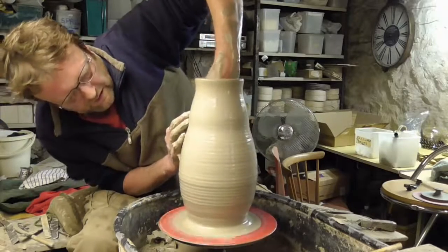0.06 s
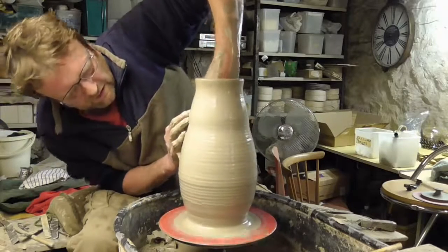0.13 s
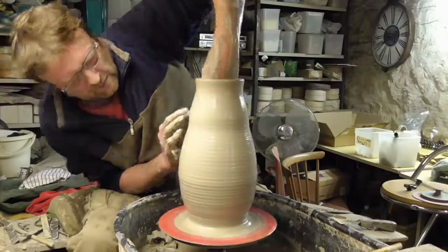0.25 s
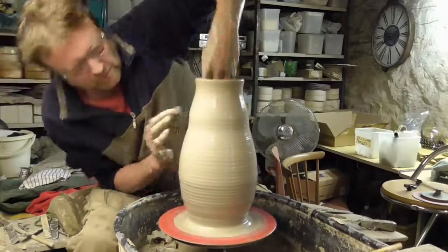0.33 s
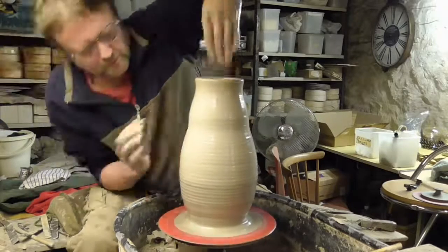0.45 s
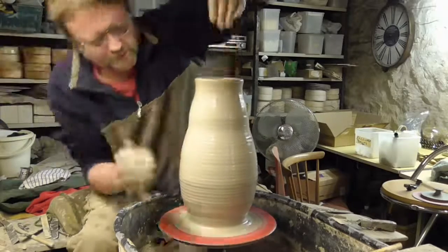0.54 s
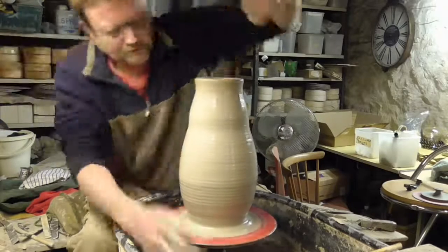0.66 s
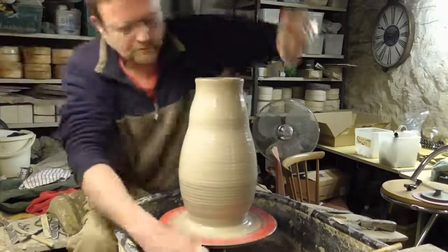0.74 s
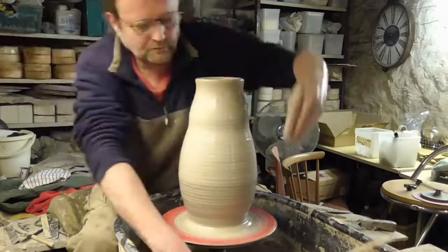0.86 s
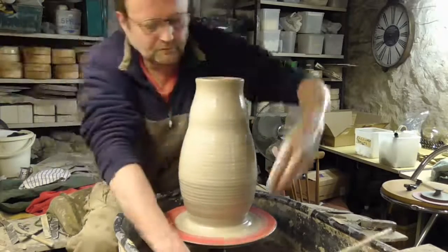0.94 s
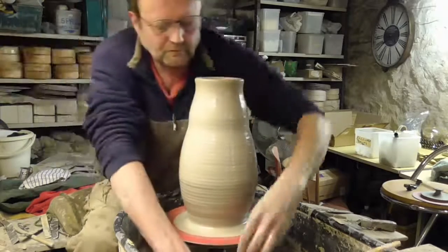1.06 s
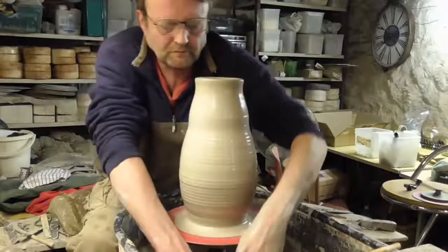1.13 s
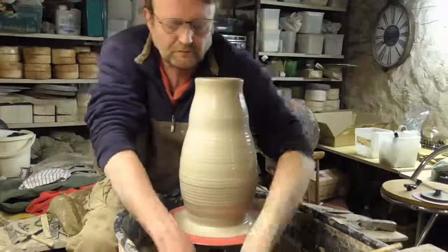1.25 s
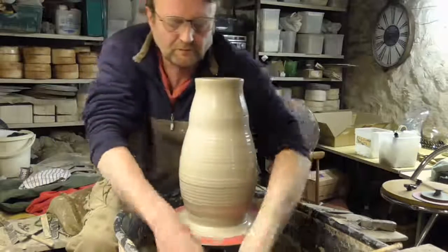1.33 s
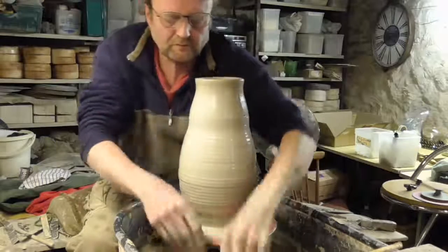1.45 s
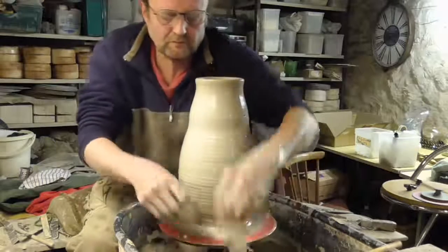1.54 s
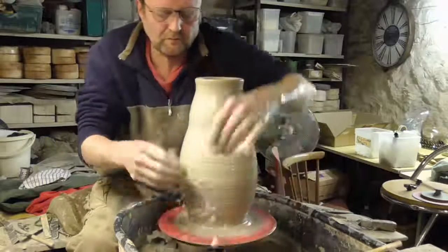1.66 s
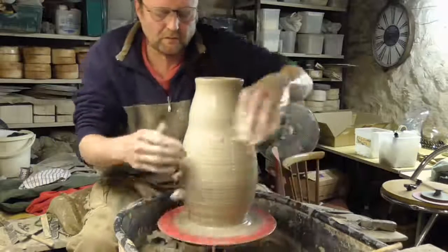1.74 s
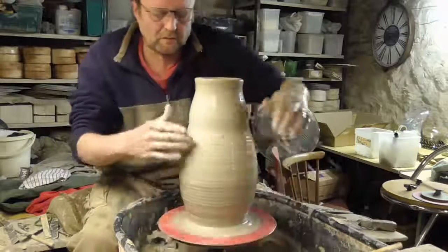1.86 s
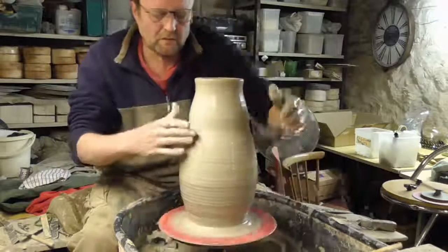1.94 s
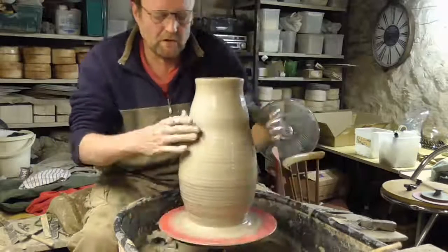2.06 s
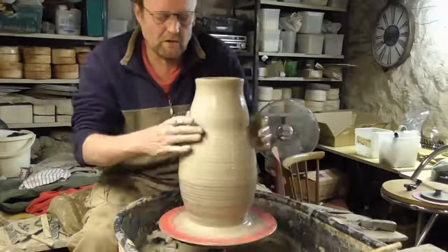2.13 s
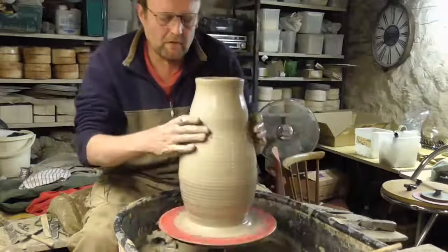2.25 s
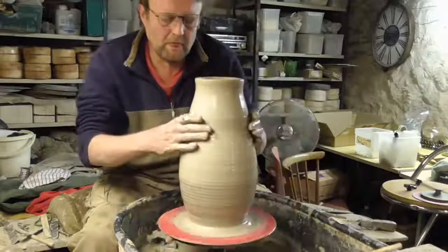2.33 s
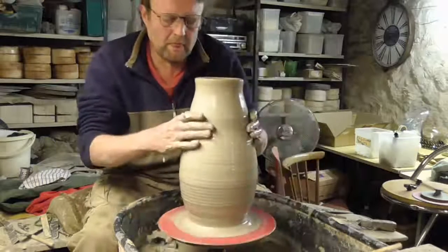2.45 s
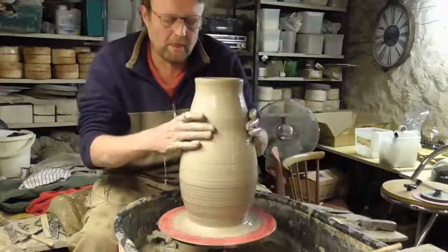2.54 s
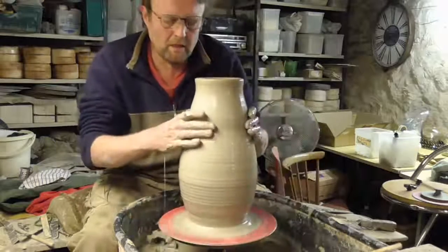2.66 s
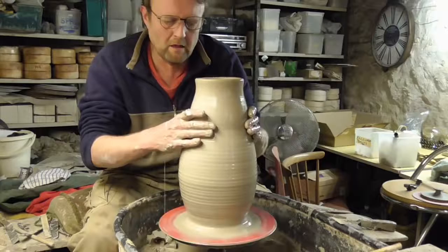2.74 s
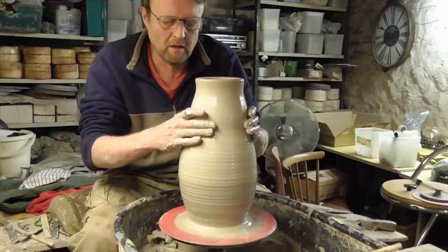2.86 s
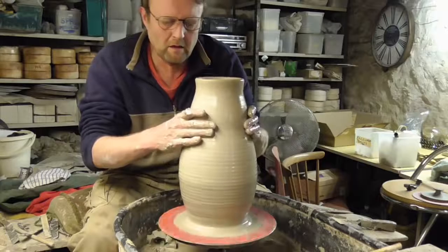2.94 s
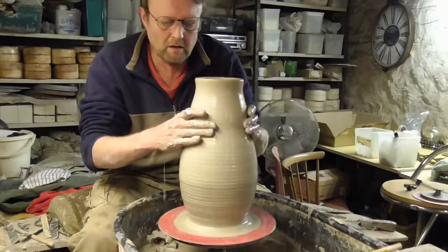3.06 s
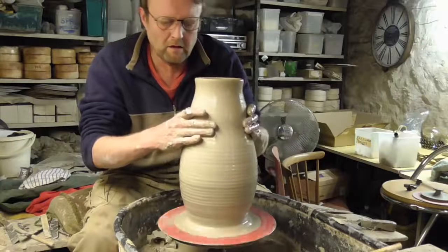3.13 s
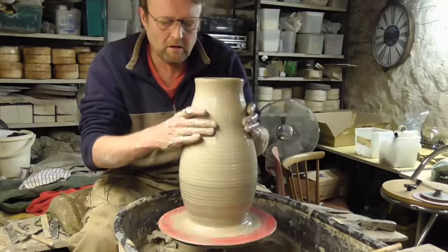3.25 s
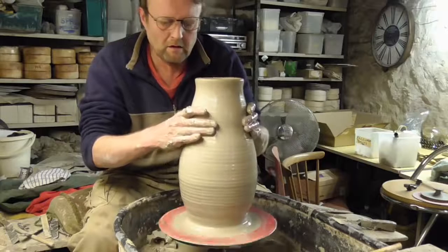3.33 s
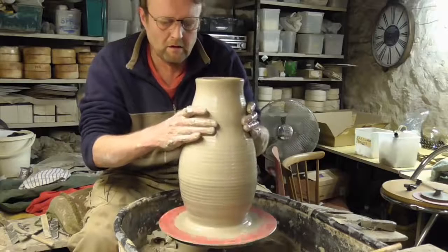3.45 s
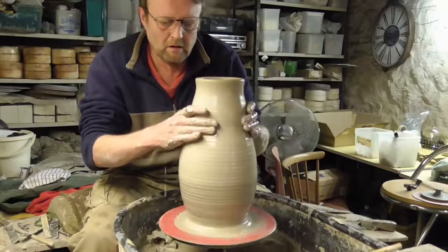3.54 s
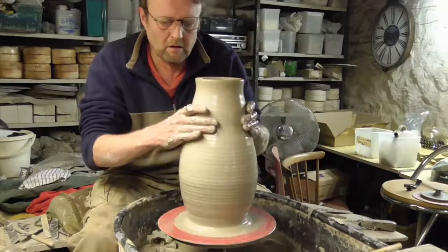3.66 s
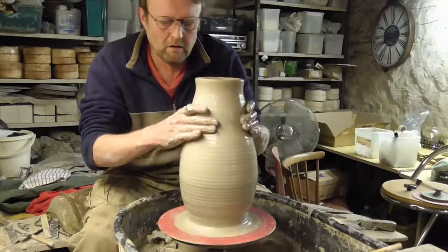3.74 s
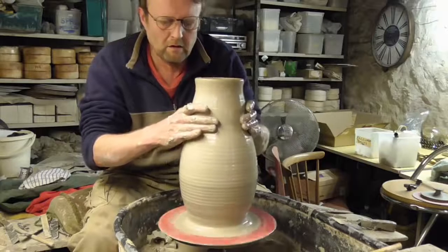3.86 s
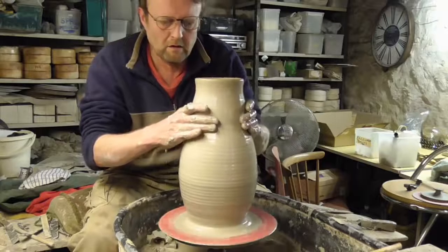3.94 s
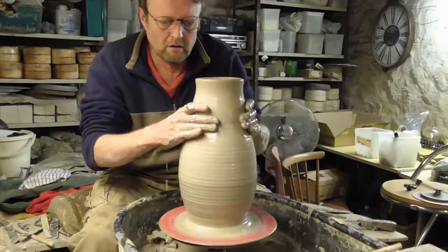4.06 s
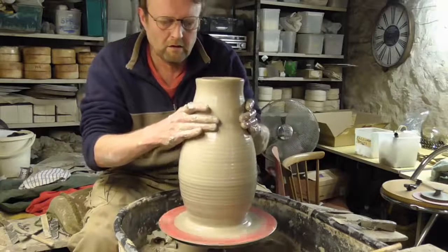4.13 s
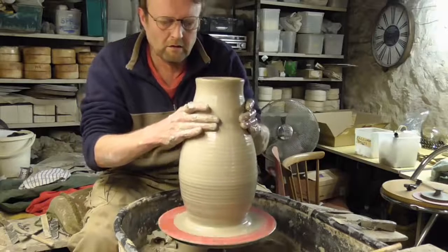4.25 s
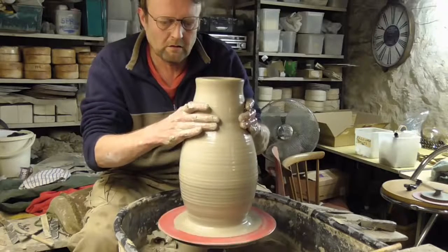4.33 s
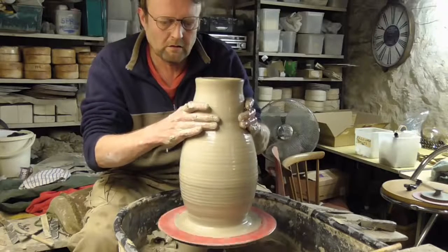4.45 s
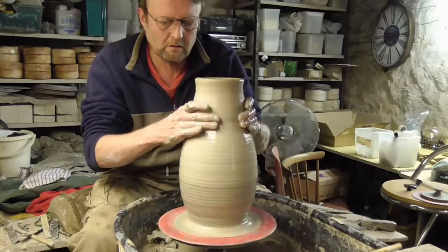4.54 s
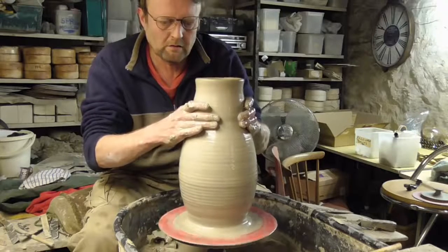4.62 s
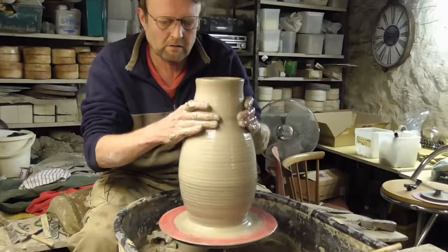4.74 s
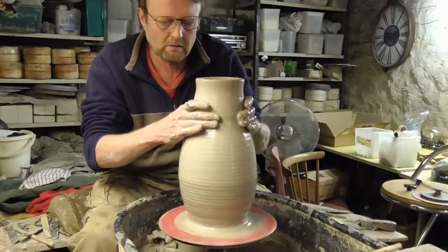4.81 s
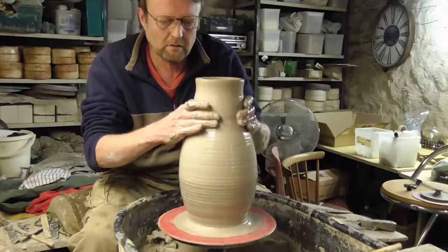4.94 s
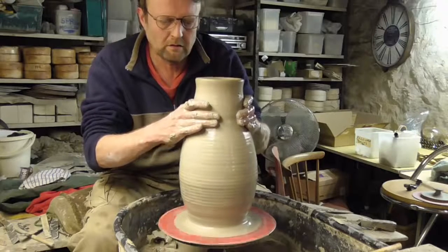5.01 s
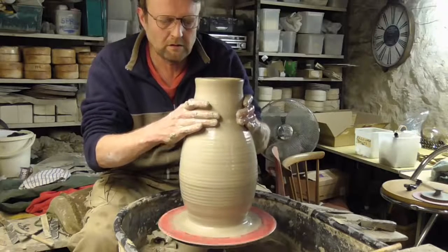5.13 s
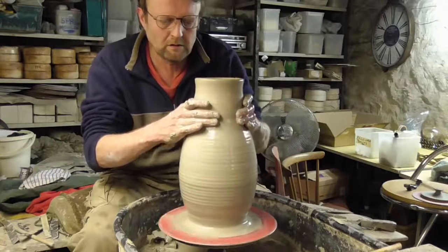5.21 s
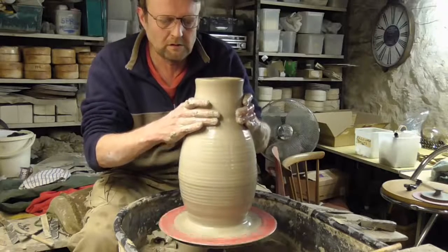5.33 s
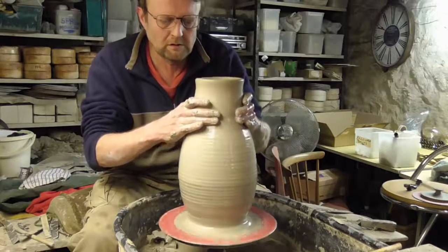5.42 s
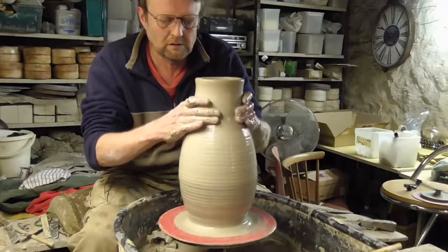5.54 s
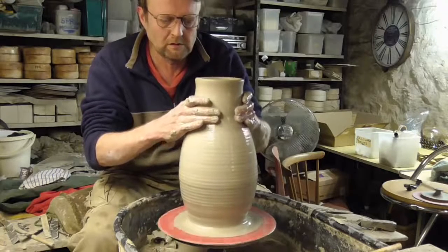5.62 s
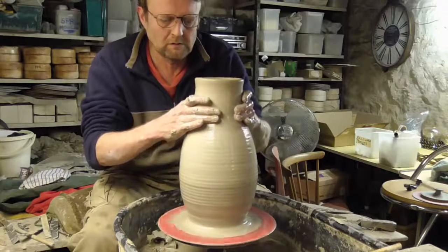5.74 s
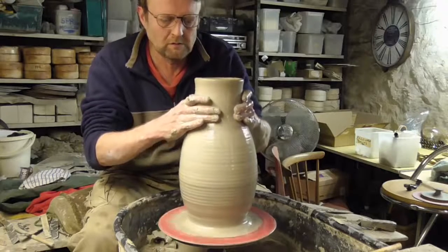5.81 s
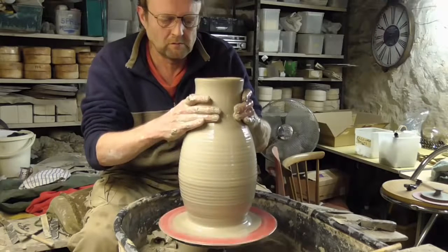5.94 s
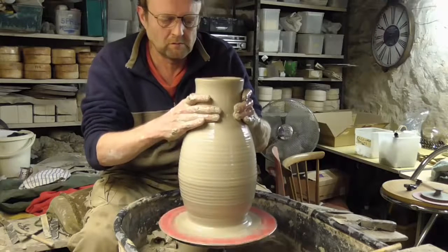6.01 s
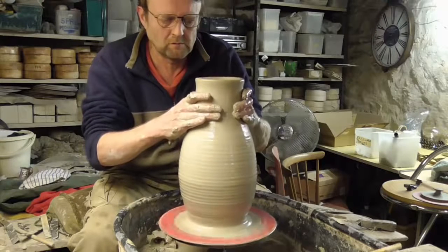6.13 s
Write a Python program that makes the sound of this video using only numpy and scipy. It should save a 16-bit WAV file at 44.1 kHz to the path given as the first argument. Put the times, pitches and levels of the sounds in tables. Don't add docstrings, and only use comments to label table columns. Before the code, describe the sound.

An electric potter's wheel hums and rumbles steadily while a hand splashes briefly in a tray, then wet palms swish over spinning clay.

```python
import sys
import numpy as np
from scipy import signal
from scipy.fft import rfft, irfft, next_fast_len
from scipy.io import wavfile
from scipy.ndimage import uniform_filter1d, map_coordinates

SR = 44100
rng = np.random.default_rng(int(sys.argv[2]) if len(sys.argv) > 2 else 0)


def attenuation_scalar(level_db):
    decades = np.asarray(level_db, float) / 20
    return 10 ** decades


def output_pcm(signal):
    pcm = np.clip(np.atleast_2d(signal).T, -1, 1) * 32767
    wavfile.write(sys.argv[1], SR, np.round(pcm).astype(np.int16))


N = 272538
T = np.arange(N) / SR


def unit(x):
    return x / np.sqrt(np.mean(x ** 2) + 1e-20)


def along(points, hz):
    f, value = np.transpose(points)
    return np.interp(np.log(hz + 1), np.log(f + 1), value)


def shape(points):
    return lambda hz: attenuation_scalar(along(points, hz))


def resonant(modes):
    return lambda f: np.sqrt(sum(attenuation_scalar(db) ** 2 / (1 + ((f - c) / (w / 2)) ** 4) for c, w, db in modes))


def loudness(rows):
    s, db = np.transpose(rows)
    return attenuation_scalar(np.interp(T, s, db, -120, -120))


def wobble(rate):
    return map_coordinates(rng.standard_normal(int(N * rate / SR) + 4), [T * rate])


def crackle(density, size_db, decay):
    counts = np.bincount(rng.integers(0, N, int(density * N / SR)), minlength=N)
    hits = counts * attenuation_scalar(-size_db * np.log(rng.random(N) + 3e-3))
    return unit(signal.lfilter([1], [1, -np.exp(-1 / (decay * SR))], hits))


def rush(gain, alike, patchy_db, lead=0):
    z = signal.stft(rng.standard_normal((2, N)), nperseg=512)[2]
    field = uniform_filter1d(rng.standard_normal(z.shape[1:]), size=6, axis=0)
    field = uniform_filter1d(field, size=8, axis=1)
    pair = signal.istft(z * attenuation_scalar(patchy_db * unit(field)), nperseg=512)[1][:, :N]
    m = next_fast_len(N + 8192)
    hz = np.fft.rfftfreq(m, 1 / SR)
    turn = np.arccos(np.clip(along(alike, hz), -1, 1)) / 2
    mid, side = rfft(pair, m) * gain(hz) * [np.cos(turn), np.sin(turn)]
    left = (mid + side) * np.exp(.5j * lead)
    right = (mid - side) * np.exp(-.5j * lead)
    return unit(irfft([left, right], m)[:, :N])


def plinks(rows, longer, ring_db, spread, rise, attack):
    burst_s, burst_law = 0.081, 0.51
    out, t = np.zeros((2, N + SR)), T[:8192]
    f = np.fft.rfftfreq(len(t), 1 / SR) + 1
    for s, db, hz in rows:
        burst = longer * burst_s * (1000 / hz) ** burst_law
        tone = attenuation_scalar(ring_db - 75 * t / burst) * np.sin(2 * np.pi * hz * t * (1 + rise * t / burst))
        both, each = rng.standard_normal(len(t)), rng.standard_normal((2, len(t)))
        mixed = both + np.clip((hz / 9000) ** 2, .12, .85) * each
        band = np.exp(-(np.log2(f / hz) / max(spread, .1)) ** 2)
        hiss = 0.37 * unit(irfft(rfft(mixed) * band)) * attenuation_scalar(-60 * t / burst)
        onset = 1 - np.exp(-t / attack)
        out[:, round(s * SR):][:, :len(t)] += attenuation_scalar(db) * (tone + hiss) * onset
    return out[:, :N]


def fizz(density, low_hz, spread, cycles, size_db):
    count = int(density * N / SR)
    start, pick, size, pan = rng.random((count, 4)).T[:, :, None]
    hz, t = low_hz * np.exp(spread * pick), T[:256]
    ring = np.exp(-t * hz / cycles) * np.sin(2 * np.pi * np.minimum(hz, 15000) * t)
    grain = attenuation_scalar(-size_db * np.log(size + 1e-4)) * ring
    at = ((start * (N - 256)).astype(int) + np.arange(256)).ravel()
    sides = [(grain * (1 + side * (pan - .5))).ravel() for side in (.6, -.6)]
    return unit(np.array([np.bincount(at, grains, N) for grains in sides]))


def hum():
    mains_hz, pulley_hz = 100.0275, 4.681
    # multiple, level/dB, path lag/ms
    tones = [(1, -28, 4.45), (2, -32, .875), (3, -42, .64), (4, -64, 0)]
    # order, level/dB, swell peak t/s
    throb_1 = [(-1, -42, .034), (1, -50, .132), (2, -45, .0235), (3, -48, .053)]
    throb_2 = [(-1, -41, .068), (-2, -47, .095), (-4, -47, .0255)]
    throb_3 = [(-1, -51, .017), (-2, -51, .0595), (1, -53, 0), (2, -53, .0255), (3, -53, .006)]
    # order, level/dB
    orders_0 = [(17, -57), (18, -54), (20, -59), (21, -56), (24, -59), (25, -62), (29, -56), (30, -62),
                (31, -57), (32, -61), (33, -61), (35, -61), (47, -61), (48, -62)]
    orders_1 = [(-3, -59), (-2, -57), (7, -55), (8, -55), (9, -59), (10, -56), (11, -58), (13, -59),
                (14, -57), (17, -50), (18, -50), (21, -50), (32, -61), (47, -62)]
    orders_2 = [(-8, -59), (-5, -52), (-3, -57), (2, -55), (5, -60), (7, -62), (22, -58)]
    orders_3 = [(6, -66), (7, -63), (13, -66)]
    lines = []  # (level in dB, phase in turns)
    for (m, db, lag_ms), throbs in zip(tones, [throb_1, throb_2, throb_3, []]):
        phase = m * mains_hz * (T - lag_ms / 1000)
        lines.append((db, phase))
        lines += [(side_db, phase + k * pulley_hz * (T - peak)) for k, side_db, peak in throbs]
    for m, orders in enumerate([orders_0, orders_1, orders_2, orders_3]):
        drift = 1.2 * wobble(1.0)
        lines += [(db + drift, (m * mains_hz + k * pulley_hz) * T + rng.random()) for k, db in orders]
    lead = np.array([[-.1], [.1]])
    return sum(np.sqrt(2) * attenuation_scalar(db) * np.cos(2 * np.pi * turns + lead) for db, turns in lines)


def frame():
    # f/Hz, width/Hz, level/dB
    modes = [(102, 51, -13), (180.8, 13.7, 0.5), (209, 44, -7.5), (253, 20, -14), (301.1, 29.6, 0),
             (350, 54, -19.5), (399, 9.7, -13.5), (494.8, 11, -11.5), (515, 12.3, -11.5), (620, 20.3, -14),
             (838, 34, -25.5), (1030, 79, -45), (1200, 54, -25), (1374, 47, -29.5)]
    # f/Hz, level per Hz/dB
    rumble = [(20, -31), (55, -34), (90, -32), (150, -4), (260, -7.5), (450, -14.5), (560, -18),
              (900, -23.5), (1500, -32.5), (1800, -46), (4000, -76)]
    # f/Hz, level per Hz/dB
    whirr_curve = [(880, -7), (1500, -7), (1610, -8.5), (1870, -10), (2060, -5.5), (2590, -11),
                   (3120, -7.5), (3380, -9), (4370, -8), (6120, -15), (7610, -12.5), (8240, -15),
                   (11500, -12.5), (16000, -17.5)]
    # f/Hz, width/Hz, level/dB
    whine_modes = [(2030, 17, -1), (3017, 25, 1.5), (3110, 40, -6), (4390, 80, -9)]
    # f/Hz, likeness (1 = same)
    alike = [(30, 0.5), (60, 0.45), (180, 0.94), (550, 0.83), (1650, 0.63), (4970, 0.45), (15000, 0.048)]
    load = wobble(4.7)
    sway = 1.3 * wobble(5)
    ring = attenuation_scalar(-37.5 + sway) * rush(resonant(modes), alike, patchy_db=1.5, lead=-0.18)
    broad_db = -41.0 + 1.4 * load + 0.68 * wobble(8)
    broad = attenuation_scalar(broad_db) * rush(shape(rumble), alike, patchy_db=1.0, lead=-0.19)
    flutter = .3 * load + .4 * wobble(25)
    whirr = attenuation_scalar(-60.5 + flutter) * rush(shape(whirr_curve), alike, patchy_db=1.3)
    whine_db = -76 + 0.54 * T + 5.1 * flutter + 1.17 * wobble(3.04)
    whine = attenuation_scalar(whine_db) * rush(resonant(whine_modes), alike, patchy_db=-2.5)
    return ring + broad + whirr + whine


def bumps():
    # t/s, peak level/dB, f/Hz
    thuds = [(0.2215, -43, 1150), (0.2888, -34.5, 1246), (0.616, -36.5, 1190), (1.370, -27, 600),
             (1.371, -30, 1180), (2.085, -34.5, 1150), (2.2288, -34, 1310), (2.232, -27.5, 621),
             (2.2586, -35, 1200), (3.1138, -33.5, 1350), (3.2781, -38.5, 1327), (3.4203, -37, 1307),
             (3.719, -39, 1366), (3.862, -42, 1250), (4.085, -40.5, 1610), (4.6088, -31.5, 1350),
             (4.61, -32, 632), (4.635, -37, 1270), (5.047, -38.5, 1310), (5.36, -35.5, 1244),
             (5.5072, -34, 1286)]
    return attenuation_scalar(-2.5) * plinks(thuds, longer=1.47, ring_db=-4.5, spread=0.36, rise=0, attack=0.0037)


def knocks():
    # t/s, peak level/dB, damping by the hand (times)
    hits = [
        (.976, -19.5, 1.04),
        (1.169, -35, 1.4),
        (1.371, -27.5, 1.8),
        (1.398, -38, 2.5),
        (1.523, -33, 0.9),
    ]
    # f/Hz, level/dB, time to fall 60 dB/s
    tray = [(493, -17.5, 0.19), (654, -9, 0.049), (776, -3, 0.18), (813, -8, 0.2), (1030, -6, 0.05),
            (1350, -21, 0.083), (1820, -19, 0.041), (2120, -28, 0.069)]
    out, t = np.zeros(N + SR), T[:SR // 2]
    for s, db, damping in hits:
        ring = 0
        for hz, level, t60 in tray:
            mode_db = level + rng.normal(0, 0.79) - 60 * damping * t / t60
            ring = ring + attenuation_scalar(mode_db) * np.sin(2 * np.pi * hz * t)
        out[round(s * SR):][:len(t)] += attenuation_scalar(db) * ring * (1 - np.exp(-t / 0.0011))
    return out[:N]


def stirred(fall, sag, bright, deep):
    # t/s, hold/s, slosh level/dB, spray over slosh/dB, gurgle over slosh/dB
    stirs = [
        (0.905, .05, -64.5, 7, 11),
        (0.992, .005, -48, 1, -6),
        (1.108, 0.0058, -53, -2, -2.5),
        (1.266, 0.031, -51.5, 5, -3.5),
        (1.392, 0.17, -51, 2, -2),
        (1.642, 0.2, -54, 4.5, -11),
        (1.942, 0.039, -48, -9, -7),
    ]
    total = 0
    for s, hold, db, spray_db, gurgle_db in stirs:
        peak_db = db + bright * spray_db + deep * gurgle_db
        rise_db = 300 * np.minimum(T - s, 0)
        sag_db = sag * np.clip(T - s, 0, hold)
        fall_db = fall * np.maximum(T - s - hold, 0)
        total = total + attenuation_scalar(peak_db + rise_db - sag_db - fall_db)
    return total


def drops():
    # t/s, peak level/dB, f/Hz
    bright = [(.637, -42, 8900), (.8834, -36, 11600), (.9298, -32.5, 7000), (.9612, -37, 10800),
              (.9744, -37, 12400), (.984, -25.5, 10700), (1.0054, -35, 11800), (1.042, -37.5, 8300),
              (1.0849, -40, 10600), (1.0949, -33.5, 10300), (1.1055, -29, 6830), (1.1268, -34, 10100),
              (1.162, -49, 8500), (1.1807, -40, 7590), (1.2527, -29, 8620), (1.271, -38, 6150),
              (1.2865, -38, 7220), (1.3074, -29.5, 7800), (1.3442, -39, 12500), (1.4264, -38, 12000),
              (1.4454, -42, 11200), (1.476, -37, 12500), (1.486, -31, 6670), (1.5024, -34, 8200),
              (1.5294, -37, 9200), (1.575, -32, 11100), (1.5948, -30, 11600), (1.6144, -35, 8660),
              (1.6305, -23, 8100), (1.6639, -17, 9920), (1.654, -36, 10600), (1.691, -34, 11000),
              (1.734, -33, 10500), (1.7844, -38, 10800), (1.806, -43, 8500), (1.866, -41, 8000),
              (2.0654, -46, 7600), (2.0855, -41, 7550), (2.1964, -20.5, 11200)]
    spatter = [(1.2564, -26.5, 5500), (1.3009, -22.5, 10100), (1.3878, -28, 11150), (1.3997, -14.5, 7600),
               (1.4154, -17, 10900), (1.6985, -21, 12500), (1.715, -16, 11530), (1.8322, -26.5, 11100),
               (1.8494, -22.5, 10000), (1.923, -24.5, 7460), (1.9599, -20.5, 7300)]
    slaps = [(.6345, -47.5, 2150), (.7248, -47, 3740), (.9227, -44, 4600), (.9616, -42, 1530),
             (.9832, -30.5, 2040), (.984, -28, 3160), (1.1043, -40, 4600), (1.1264, -40, 4180),
             (1.2366, -36.5, 4780), (1.2554, -35, 4620), (1.27, -31.5, 3110), (1.345, -41, 1670),
             (1.3731, -42, 2400), (1.3912, -32, 3070), (1.5209, -32, 1940), (1.545, -34, 1500),
             (1.575, -37, 1280), (1.6641, -37, 3350), (1.7154, -51, 2100), (1.8068, -42, 4440),
             (1.9075, -37, 2880), (1.93, -35, 3230), (1.9583, -27, 3900), (2.0862, -46, 2040)]
    gulps = [(.914, -39.5, 1028), (.962, -32, 1030), (1.147, -43, 1080), (1.181, -43, 1150),
             (1.281, -38.5, 1010), (1.301, -35, 1160), (1.374, -34.5, 1350), (1.416, -35.5, 1350),
             (1.457, -38, 964), (1.474, -41, 1480), (1.519, -34, 1040)]
    plops = [(.458, -53, 2020), (.9954, -33.5, 3750), (1.015, -37, 4130), (1.0254, -42, 2830),
             (1.070, -46, 3500), (1.0793, -39.5, 2000), (1.080, -46, 2310), (1.1616, -43, 4000),
             (1.201, -42, 2280), (1.406, -40, 2840), (1.4084, -35, 3350), (1.4555, -33, 4200),
             (1.457, -42, 2670), (1.4749, -33.5, 3230), (1.476, -36, 3850), (1.5434, -40.5, 4410),
             (1.5673, -39, 1850), (1.5953, -41, 3500), (1.7323, -38, 3330), (1.8655, -41, 4570),
             (1.9144, -32.5, 3130), (1.917, -35.5, 3660), (2.1958, -35.5, 4460)]
    spits = [(.9305, -43, 12000), (.9615, -43, 8000), (1.048, -42, 13000), (1.0625, -40, 12500),
             (1.1275, -39, 13000), (1.19, -42, 10000), (1.213, -42, 13300), (1.262, -38, 12000),
             (1.288, -36, 12500), (1.345, -42, 9500), (1.400, -27, 12000), (1.465, -40, 10500),
             (1.513, -40, 12000), (1.535, -38, 12500), (1.609, -38, 8000), (1.636, -36, 12500),
             (1.724, -36, 11500), (1.752, -42, 12000), (1.791, -40, 11000), (1.825, -40, 13000),
             (1.855, -38, 12500), (1.925, -30, 11500), (1.955, -40, 11000), (1.966, -38, 12500)]
    out = attenuation_scalar(1.5) * plinks(bright, longer=0.89, ring_db=-6.5, spread=0.36, rise=0.075, attack=0.00055)
    out += attenuation_scalar(-4.0) * plinks(spatter, longer=0.95, ring_db=-9.0, spread=0.62, rise=0.13, attack=0.0004)
    out += attenuation_scalar(2.5) * plinks(slaps, longer=0.95, ring_db=-9.0, spread=0.63, rise=0.124, attack=0.00073)
    out += attenuation_scalar(1.0) * plinks(gulps, longer=1.06, ring_db=3.0, spread=0.8, rise=0.043, attack=0.002)
    out += attenuation_scalar(0.0) * plinks(plops, longer=1.12, ring_db=-2.5, spread=0.23, rise=0.032, attack=0.00067)
    out += attenuation_scalar(6.0) * plinks(spits, longer=.4, ring_db=-14, spread=.45, rise=.05, attack=.00015)
    return out


def water():
    # f/Hz, level per Hz/dB
    gurgle_curve = [(400, -63), (700, 0.5), (1300, 1), (1900, -29), (3000, -80)]
    slosh_curve = [(900, -60), (1500, -7), (2500, -9), (4000, -6.5), (6000, -21), (9000, -120)]
    spray_curve = [(2650, -29), (4500, 0.5), (5530, -6), (7510, 2), (8960, -6), (9830, -5), (10100, 1.5),
                   (13100, 1), (14400, -14), (15500, -30)]
    near = [(500, 1.0), (10000, 0.96)]  # f/Hz, left-right likeness
    slosh_fall, slosh_sag = 149, 24
    gurgle = stirred(slosh_fall, slosh_sag, bright=0, deep=0.79)
    slosh = stirred(slosh_fall, slosh_sag, bright=0, deep=0)
    spray = stirred(230, 0, bright=0.61, deep=0)

    deep_bursts = .5 + .4 * crackle(60, size_db=3, decay=.01)
    deep = deep_bursts * rush(shape(gurgle_curve), near, patchy_db=3)

    low_bursts = .5 + .4 * crackle(90, size_db=3, decay=.008)
    low = low_bursts * rush(shape(slosh_curve), near, patchy_db=2)
    low += .5 * fizz(600, low_hz=1500, spread=1.4, cycles=6, size_db=3.5)

    high_bursts = .35 + .7 * crackle(260, size_db=3.5, decay=.002)
    high = high_bursts * rush(shape(spray_curve), near, patchy_db=2)
    high += .3 * fizz(250, low_hz=4000, spread=1.2, cycles=7, size_db=3)
    return gurgle * attenuation_scalar(7.5) * deep + slosh * attenuation_scalar(-2.5) * low + spray * attenuation_scalar(-1.5) * high + drops()


def hands():
    # t/s, level/dB
    swish = [
        [(.44, -72), (.5, -62), (.55, -55.5), (.63, -54), (.67, -68), (.74, -59.5)],
        [(1.98, -64), (2.06, -54.5), (2.3, -53), (2.5, -56.5), (2.65, -61.5), (2.84, -64.5), (2.87, -63)],
    ]
    # f/Hz, level per Hz/dB
    film_curve = [(1470, 1), (2500, -6), (3370, -8), (4860, -4.5), (5320, -6.5), (5830, -3), (7390, -3),
                  (8420, -5.5), (9370, -4), (10200, -3.5), (11400, -0.5), (13100, -6), (15500, -17)]
    # f/Hz, width/Hz, level/dB
    gaps = [(4870, 260, -2), (7600, 390, -5), (9150, 400, -9), (11150, 1000, -1.5)]
    # t/s, length/s, centre f/Hz, width/Hz, level/dB
    squeezes = [(2.9, 0.034, 11000, 2500, -64), (4.083, 0.057, 11400, 2500, -60),
                (4.638, 0.065, 7600, 1000, -60), (0.79, 0.079, 10600, 8400, -57.5),
                (.19, 0.048, 4500, 5200, -61.5), (4.08, .035, 3600, 3100, -58.5),
                (4.2, 0.032, 2600, 1600, -64), (5.19, 0.027, 2800, 2200, -66), (8.9, .03, 4200, 2000, -65)]
    # t/s, peak level/dB, f/Hz
    ticks = [(2.7836, -49, 11300), (2.8579, -54, 7040), (2.9956, -45, 11900), (3.2111, -46, 11000),
             (3.3927, -43.5, 8300), (3.8846, -53, 9340), (4.0871, -45, 11000), (4.7794, -53, 7150),
             (5.097, -44, 7900), (5.1522, -36.5, 10400), (5.4934, -52, 7520), (6.0896, -49, 10700)]
    sliding = sum(loudness(part) for part in swish)
    film = sliding * rush(shape(film_curve), [(3000, 1.0), (12000, 0.41)], patchy_db=1.5)
    film += attenuation_scalar(-5.5) * loudness(swish[1]) * rush(resonant(gaps), [(3000, 0.48)], patchy_db=4.5)
    for s, length, hz, width_hz, db in squeezes:
        swell = np.sin(np.pi * np.clip((T - s) / length, 0, 1) ** 0.83)
        puff = rush(lambda f: np.exp(-((f - hz) / width_hz) ** 2 * 2), [(3000, .6)], patchy_db=1)
        film += attenuation_scalar(db) * swell * puff
    return film + attenuation_scalar(1.0) * plinks(ticks, longer=0.93, ring_db=-11.5, spread=0.71, rise=0.033, attack=0.00016)


def room(x):
    # f/Hz, time to fall 60 dB/s
    dying = [(300, 0.13), (2000, 0.1), (8000, 0.13), (14000, 0.029)]
    hz, t, z = signal.stft(rng.standard_normal((2, SR // 2)), SR, nperseg=256)
    tail = signal.istft(z * attenuation_scalar(-60 * t / along(dying, hz)[:, None]), SR, nperseg=256)[1]
    tail = tail / np.linalg.norm(tail[0])
    delayed = np.pad(x.mean(0), (130, 0))[None]
    return signal.fftconvolve(delayed, tail, axes=1)[:, :N]


def scene():
    near = water() + hands() + knocks() + bumps()
    return hum() + frame() + near + attenuation_scalar(-8.5) * room(near)


def top_cut(x):
    return signal.sosfilt(signal.butter(12, 16340, fs=SR, output="sos"), x)


def record(dry):
    # f/Hz, level/dB
    mic = [(13000, 0), (15500, -5)]
    # f/Hz, level/dB
    lean_curve = [(60, 0), (180, 0.5), (550, -2), (1650, -1.5), (4970, -0.5), (15000, -1.5)]
    top_hz, fade_in_s = 15800, .002
    lead_in = 2048
    running = np.pad(dry, ((0, 0), (lead_in, lead_in)), "reflect", reflect_type="odd")
    m = next_fast_len(N + 8192)
    hz = np.fft.rfftfreq(m, 1 / SR)
    lean = along(lean_curve, hz) / 2 * np.array([[1], [-1]])
    response = attenuation_scalar(along(mic, hz) + lean) * (hz < top_hz)
    heard = irfft(rfft(running, m) * response, m)[:, lead_in:lead_in + N]
    fade = np.sin(np.pi / 2 * np.minimum(T / fade_in_s, 1)) ** 2
    return top_cut(heard * fade)


dry = scene()
out = record(dry)
output_pcm(out)
```